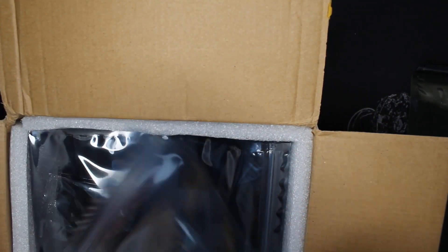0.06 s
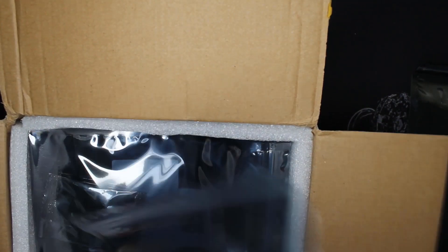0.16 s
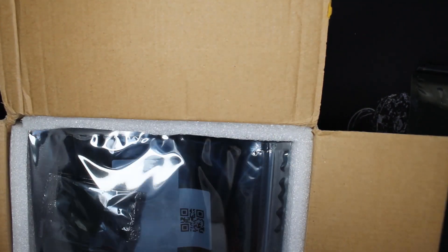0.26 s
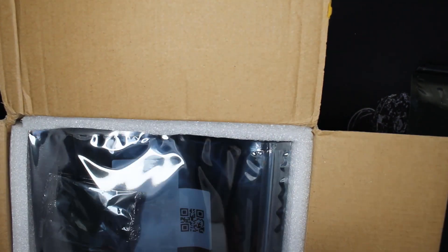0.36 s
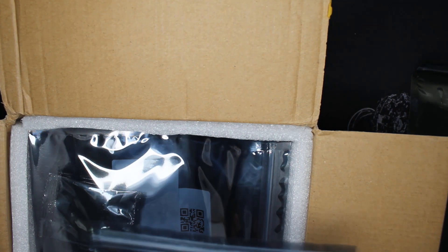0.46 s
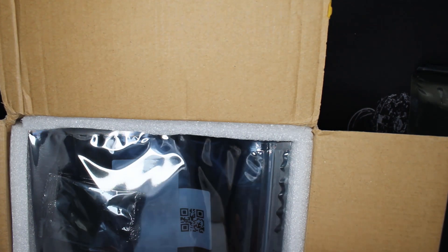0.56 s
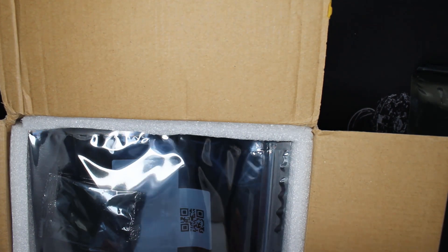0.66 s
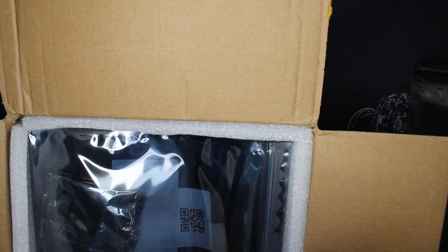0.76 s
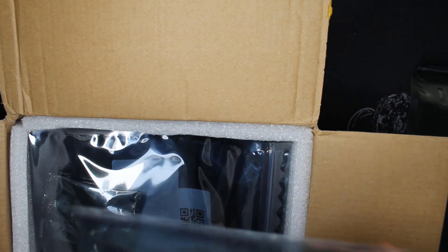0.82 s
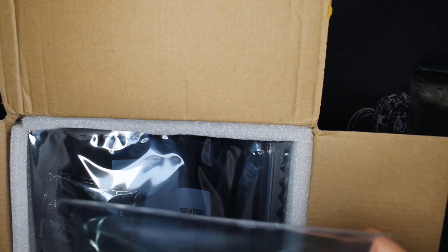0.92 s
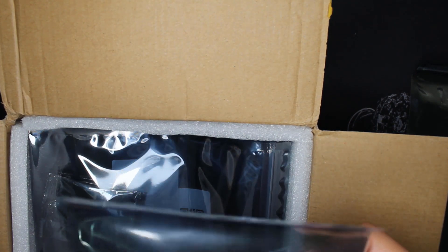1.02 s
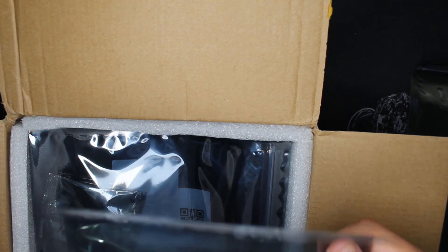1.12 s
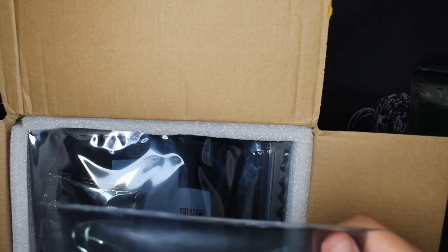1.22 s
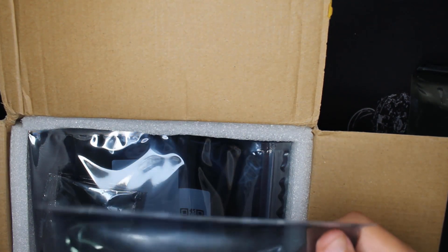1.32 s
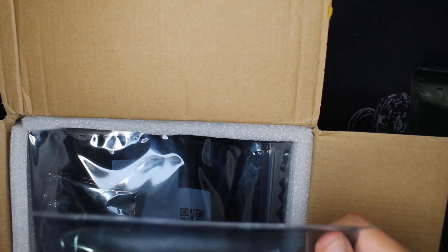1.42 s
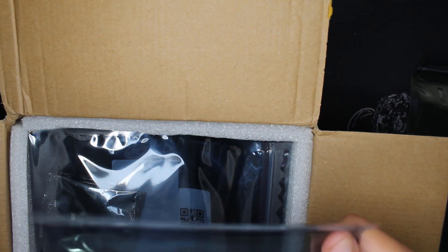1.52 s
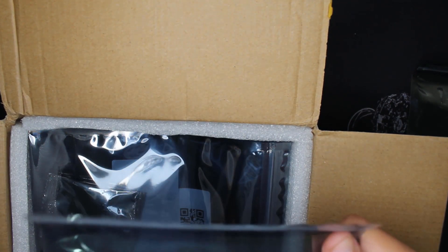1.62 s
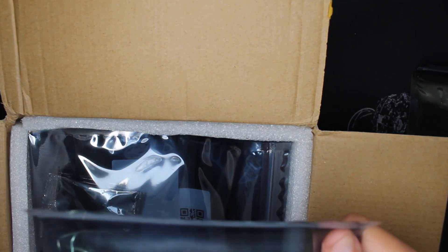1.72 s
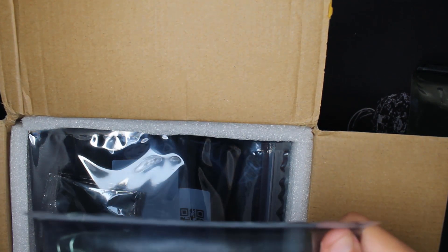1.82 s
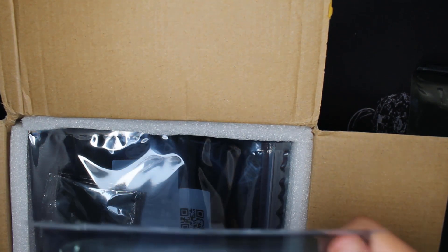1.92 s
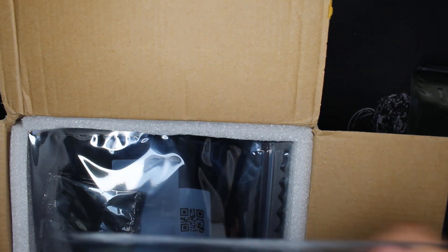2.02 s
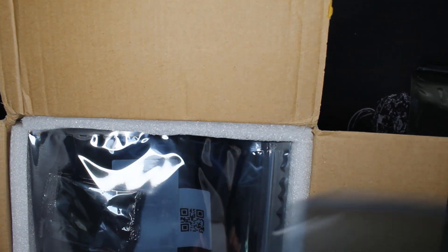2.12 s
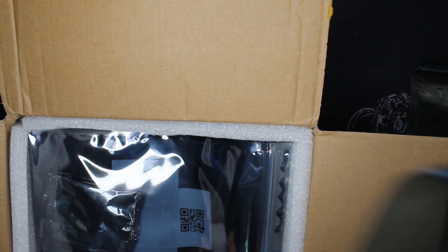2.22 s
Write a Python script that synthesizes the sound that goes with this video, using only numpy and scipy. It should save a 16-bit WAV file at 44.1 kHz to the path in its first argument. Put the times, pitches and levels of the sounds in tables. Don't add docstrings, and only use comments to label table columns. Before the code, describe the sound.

Stiff plastic bag crinkles, handled close to the microphone in a small quiet room. Brief rubs, dull bumps and irregular snaps open it, with a strong crack near 0.47 s and the brightest, loudest at 0.64 s. It thins to sparse ticks after 0.8 s, a soft rub passes around 1.45 s, a snap at 1.76 s, then a quick quiet flurry from 1.9 s settles over low rumble and hiss.

```python
import sys
import numpy as np
from scipy import signal
from scipy.fft import rfft, irfft
from scipy.io import wavfile

SR = 44100
rng = np.random.default_rng(int(sys.argv[2]) if len(sys.argv) > 2 else 0)


def elevation(decibels):
    levels = np.asarray(decibels, float)
    return 10 ** (levels / 20)


def persist_wave(psi):
    counts = np.round(np.clip(psi, -1, 1) * 32767).astype(np.int16)
    wavfile.write(sys.argv[1], SR, np.atleast_2d(counts).T)


N = 101430


def rms_one(x):
    return x / np.sqrt(np.mean(x ** 2) + 1e-20)


def in_time(rows):
    return np.interp(np.arange(N) / SR, *np.transpose(rows))


def at_hz(points, hz):
    point_hz, values = np.array(points)[:, 0], np.array(points)[:, 1]
    return np.interp(np.log(hz), np.log(point_hz), values)


def band(x, low_hz, high_hz):
    edges = np.clip([low_hz, high_hz], 10, 0.45 * SR)
    return signal.sosfilt(signal.butter(2, edges, "band", fs=SR, output="sos"), x)


def coloured(x, spectrum):
    hz = np.maximum(np.arange(N // 2 + 1) * SR / N, 1)
    below = np.minimum(hz / spectrum[0][0], 1) ** 2
    return rms_one(irfft(rfft(x) * elevation(at_hz(spectrum, hz)) * below, N))


def grains(per_s, spread_db):
    sizes = elevation(spread_db * np.minimum(rng.exponential(1, N), 5))
    signs = rng.choice([-1, 1], N)
    return sizes * signs * (rng.random(N) < per_s / SR)


def lift(x, hz, width_hz, db):
    r = np.exp(-np.pi * width_hz / SR)
    zeros = np.array([1, 0, -1]) * (1 - r * r) / 2
    poles = [1, -2 * r * np.cos(2 * np.pi * hz / SR), r * r]
    return x + (elevation(db) - 1) * signal.lfilter(zeros, poles, x)


# [t/s, middle level/dB, low level/dB, high level/dB, top level/dB]
CREASE_SNAPS = [(0.0633, -39.5, -43.5, -54.5, -45.5), (0.2064, -28, -35, -42, -50.5),
                (0.2794, -44.5, -45.5, -103.5, -77), (0.3331, -39, -45.5, -63, -91),
                (0.397, -35.5, -49.5, -58, -83), (0.4214, -44.5, -50, -61, -79),
                (0.4683, -19.5, -41.5, -30, -34), (0.4918, -38, -50, -49.5, -62),
                (0.5891, -44, -46.5, -65.5, -63), (0.6394, -16, -29, -20.5, -11.5),
                (0.7672, -31, -49, -63.5, -68), (0.7986, -69, -48.5, -54.5, -80),
                (0.9208, -31.5, -43, -40, -43.5), (1.0011, -36.5, -40.5, -58, -74),
                (1.0394, -61, -73, -74, -76), (1.1717, -53.5, -61, -63, -65),
                (1.4716, -46, -52.5, -62.5, -66.5), (1.7584, -28, -37.5, -56, -60),
                (1.8964, -49, -63, -63, -48), (1.9016, -37.5, -36.5, -50.5, -63),
                (1.9084, -42.5, -45.5, -49, -63), (1.9194, -38.5, -67, -54, -50.5),
                (2.167, -50.5, -54, -63.5, -60)]
# [from f/Hz, to f/Hz, level/dB, quiver t60/s]
SNAP_COLOURS = [
    (1395, 4360, 11.5, 0.0063),
    (373.6, 1400, 24, 0.0081),
    (3900, 8230, 16, 0.022),
    (10320, 16500, 13, 0.017),
]


def snaps():
    crack_lag_s, quiver_db = 0.0006, -12
    t = np.arange(SR // 20) / SR
    cracks, quivers = 0, 0
    noise = rng.standard_normal((len(CREASE_SNAPS), 4, len(t)))
    for k, (low_hz, high_hz, db, t60) in enumerate(SNAP_COLOURS):
        crack, quiver = np.zeros((2, N + SR))
        for row, shake in zip(CREASE_SNAPS, noise[:, k]):
            i = int((row[0] + crack_lag_s) * SR)
            crack[i] = elevation(row[1 + k] + db)
            quiver[i:i + len(t)] += crack[i] * elevation(quiver_db - 60 * t / t60) * shake
        pair = np.array([crack, quiver])[:, :N] + 1e-18
        pair = band(pair, low_hz, high_hz)
        pair = band(pair, low_hz / 2, high_hz * 1.56)
        crack, quiver = band(pair, low_hz / 4, high_hz * 0.82)
        polarity = -1 if k == 1 else 1
        cracks = cracks + polarity * crack
        quivers = quivers + quiver
    return cracks, quivers


# [f/Hz, width f/Hz, level/dB]
FILM_RESONANCES = [
    (900, 250, 5),
    (2100, 600, 7),
    (3500, 700, -3),
    (4700, 900, 2.1),
    (7750, 1500, 8),
]


def film_ring(x):
    for hz, width_hz, db in FILM_RESONANCES:
        x = lift(x, hz, width_hz, db)
    return x


# [start t/s, length t/s]
RUB_SPANS = [(.0, .09), (.128, .025), (.135, .012), (.177, .014), (.185, .006), (.213, .012), (.205, .022),
             (.235, .03), (.57, .03), (.612, .003), (1.43, .11), (1.893, .035), (1.9, .025), (1.935, .03),
             (1.953, .005), (1.96, .1), (1.96, .1), (2.14, .06), (2.24, .06)]
# [level/dB, centre f/Hz]
RUB_COLOURS = [(-83, 6000), (-40, 3600), (-50, 7200), (-49.5, 10000), (-29.5, 3000), (-35, 2900),
               (-74, 4500), (-54, 2995), (-62, 1500), (-44, 6400), (-68, 4530), (-50, 3500), (-38.5, 266),
               (-46.5, 2800), (-47, 11000), (-55, 4200), (-57, 26000), (-87, 12000), (-63.5, 3800)]


def rubs():
    slips = rms_one(grains(per_s=6000, spread_db=4))
    t = np.arange(N) / SR
    spread = 2 ** 0.7
    total = 0
    for (start, length), (db, hz) in zip(RUB_SPANS, RUB_COLOURS):
        swell = np.sin(np.pi * np.clip((t - start) / length, 0, 1))
        total = total + elevation(db) * swell * band(slips, hz / spread, hz * spread)
    return total


# [t/s, level/dB]
BAG_MOTION = [
    (0, -57.5),
    (.3, -59),
    (.62, -71),
    (.85, -65.5),
    (1.05, -72.5),
    (1.4, -72.5),
    (1.85, -73.5),
    (1.95, -60.5),
    (2.3, -68.5),
]
# [f/Hz, level/dB]
RUSTLE_COLOUR = [(180, -37), (300, -2.5), (433, -11), (828, -7), (1560, -13), (2170, -14.5), (16000, -24)]


def rustle():
    crumple = grains(4600, spread_db=-2.5) + rng.standard_normal(N)
    return elevation(in_time(BAG_MOTION)) * coloured(crumple, RUSTLE_COLOUR)


# [t/s, half-width t/s, level/dB]
HAND_JOLTS = [(.04, 0.0032, -31.5), (0.091, 0.0018, -37), (0.134, 0.0047, -39), (0.226, 0.0036, -42),
              (0.278, 0.0077, -27.5), (.338, 0.0042, -37), (0.581, 0.0056, -43), (0.613, 0.013, -33),
              (0.708, 0.0079, -40), (0.776, 0.016, -41.5), (0.974, 0.0033, -55.5), (1.002, 0.006, -43),
              (1.44, 0.029, -34), (1.467, 0.0075, -41.5), (1.909, 0.0035, -44), (1.953, 0.0051, -39.5),
              (2.178, 0.0044, -46.5), (2.261, 0.0045, -47.5)]


def jolts():
    t = np.arange(N) / SR
    total = 0
    for start, width, db in HAND_JOLTS:
        square = ((t - start) / width) ** 2
        total = total + elevation(db) * (1 - square) * np.exp(-square / 2)
    return total


# [t/s, level/dB]
HANDLING = [(0.0, -53), (0.04, -34), (0.08, -45), (0.27, -38), (0.48, -50.5), (0.59, -39), (0.68, -41.5),
            (0.78, -45.5), (0.85, -48), (1.01, -39), (1.04, -48.5), (1.28, -48), (1.49, -52), (1.52, -49.5),
            (1.89, -48), (1.91, -39.5), (2.11, -51), (2.3, -50.5)]
# [f/Hz, level/dB]
RUMBLE_COLOUR = [(7.1, -40.5), (12, 6.5), (65, -9), (243, -18), (298, -24.5), (400, -26.5), (520, -59.5),
                 (880, -120)]


def rumble():
    return elevation(in_time(HANDLING) - 4.5) * coloured(grains(2000, spread_db=2.5), RUMBLE_COLOUR)


# [f/Hz, t60 t/s]
ROOM_T60 = [(400, 0.51), (1060, 0.32), (2790, .35), (7350, .33), (13000, .22)]
# [f/Hz, level/dB]
ROOM_COLOUR = [(400, -3.5), (1300, 3), (2200, -2.3), (4000, 3.5), (8000, 5.4), (14000, -1)]
ECHO_DELAYS = [.0007, .0022, .0035, .0066, .0112, .0125, .025, .028]
ECHO_LEVELS = [-10, -4.5, -4, -14, -15, -15.5, -22.5, -19]


def room(x):
    room_db, build_s = -3.5, 0.015
    box_hz, box_db, box_t60_s = 493, -36, 0.16
    echo_blur_s, echo_top_hz = 0.0013, 10040
    t = np.arange(SR // 2) / SR
    edges = 250 * 2 ** np.arange(0, 6.6, 0.5)
    white = rng.standard_normal((3, len(t)))
    tail = 0
    for k, (low, high) in enumerate(zip(edges, edges[1:])):
        middle = np.sqrt(low * high)
        decay_db = at_hz(ROOM_COLOUR, middle) - 60 * t / at_hz(ROOM_T60, middle)
        tail = tail + band(white[k % 2], low, high) * elevation(decay_db)
    tail = tail * (1 - np.exp(-(t / build_s) ** 2))
    reply = elevation(room_db) * tail / np.sqrt(np.sum(tail ** 2))
    reply += elevation(box_db - 60 * t / box_t60_s) * np.sin(2 * np.pi * box_hz * t)
    for delay, db in zip(ECHO_DELAYS, ECHO_LEVELS):
        blur = np.exp(-np.abs(t - delay) / (echo_blur_s * np.sqrt(delay)))
        echo = white[2] * (t >= delay) * blur
        reply += elevation(db) * band(echo, 240, echo_top_hz) / np.sqrt(np.sum(echo ** 2) + 1e-20)
    return x + signal.fftconvolve(x, reply)[:N]


# [f/Hz, level/dB]
HISS_COLOUR = [(30, -6), (165, 1.5), (230, -12), (480, -12.5), (1200, -21.5), (3000, -28), (9000, -32.5),
               (16000, -30.5)]


def hiss():
    return elevation(-63.5) * coloured(rng.standard_normal(N), HISS_COLOUR)


def scene():
    wash = rustle()
    thumps = rumble()
    cracks, quivers = film_ring(np.array(snaps()))
    rub = rubs()
    rub_room_share = 0.45
    in_room = room(cracks + rub_room_share * rub)
    close = (1 - rub_room_share) * rub + quivers + wash
    return (in_room + close + thumps + jolts())[None, :]


def low_pass(x):
    return signal.sosfilt(signal.butter(12, 17090, fs=SR, output="sos"), x)


def record(dry):
    heard = lift(dry, hz=7700, width_hz=2500, db=3) + hiss()
    top_cut = signal.cheby2(8, 28, 16100, fs=SR, output="sos")
    mix = signal.sosfilt(top_cut, heard)
    return low_pass(mix)


dry = scene()
out = record(dry)
persist_wave(out)
```